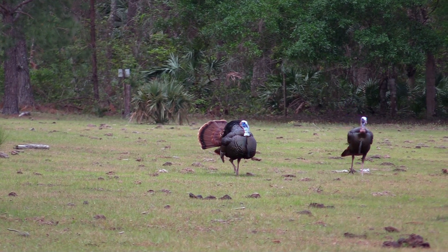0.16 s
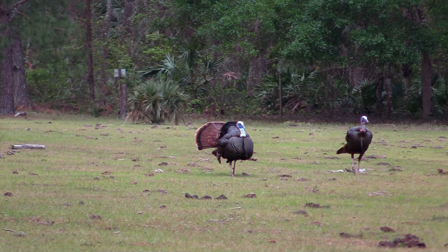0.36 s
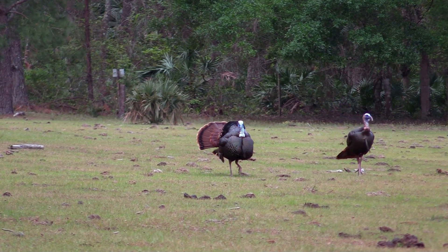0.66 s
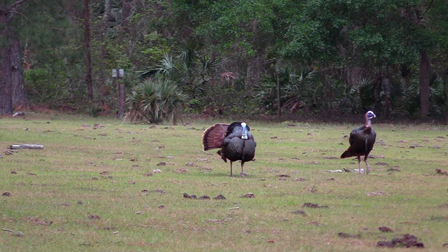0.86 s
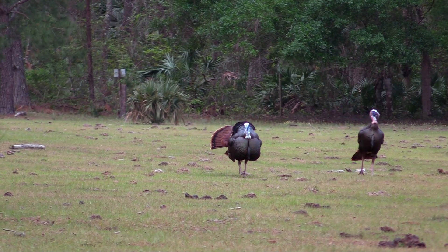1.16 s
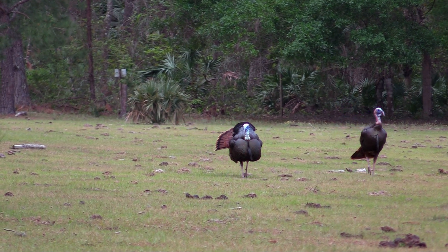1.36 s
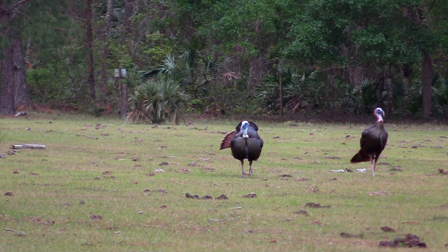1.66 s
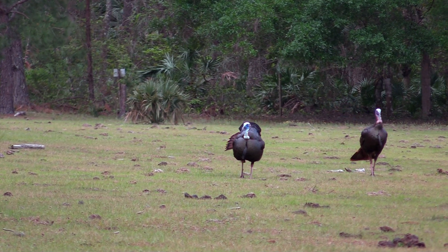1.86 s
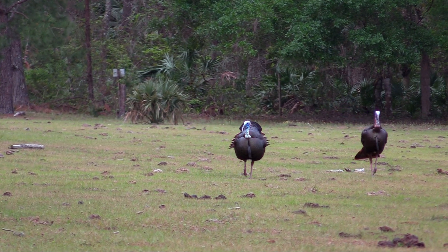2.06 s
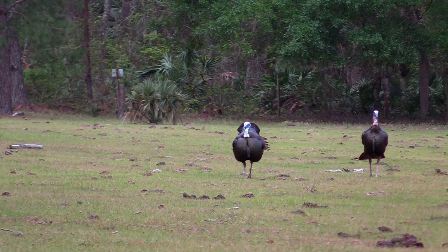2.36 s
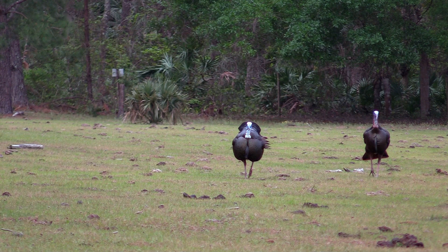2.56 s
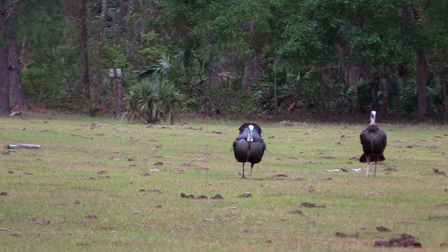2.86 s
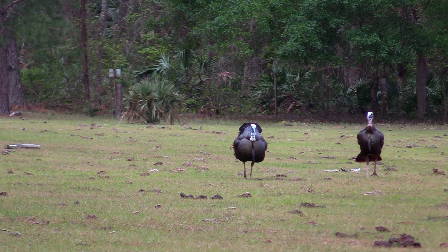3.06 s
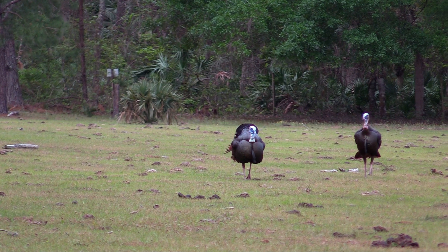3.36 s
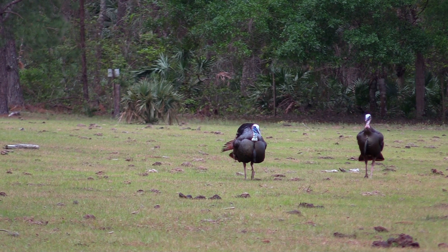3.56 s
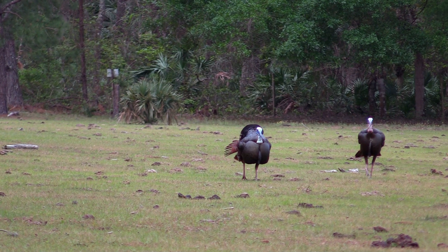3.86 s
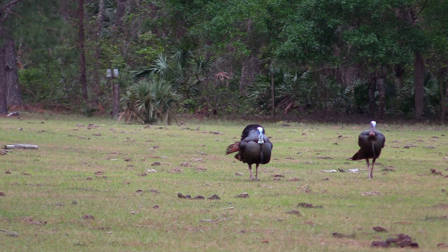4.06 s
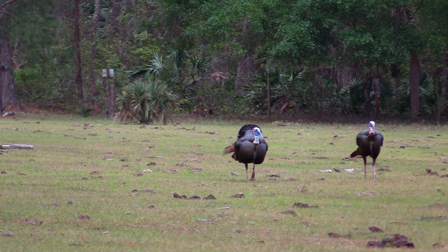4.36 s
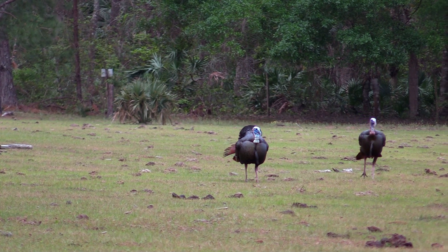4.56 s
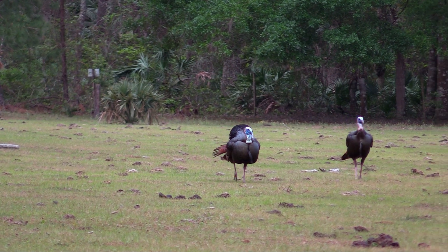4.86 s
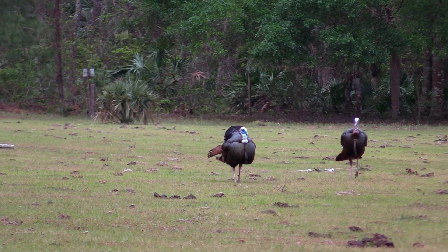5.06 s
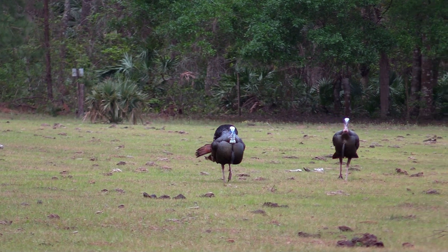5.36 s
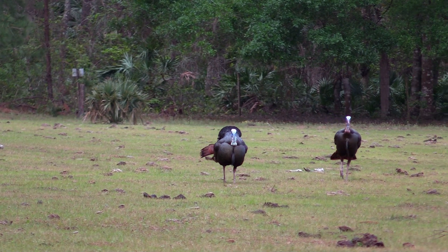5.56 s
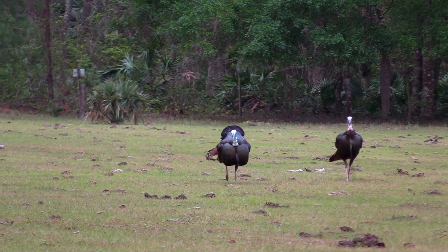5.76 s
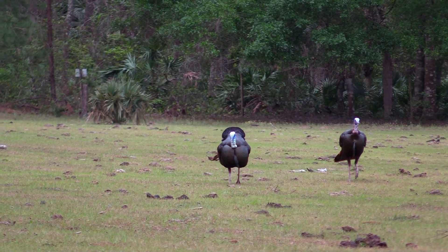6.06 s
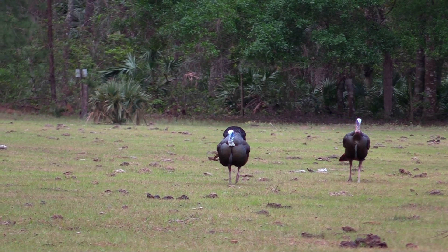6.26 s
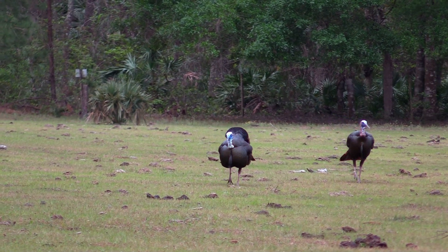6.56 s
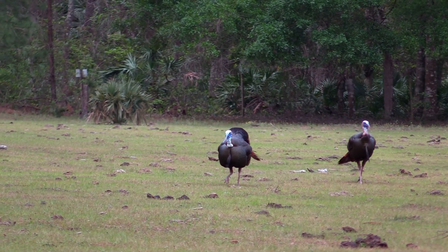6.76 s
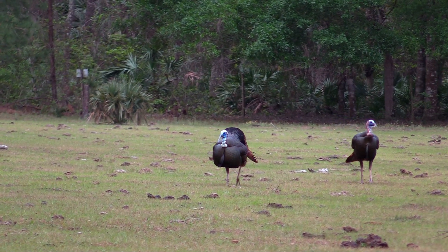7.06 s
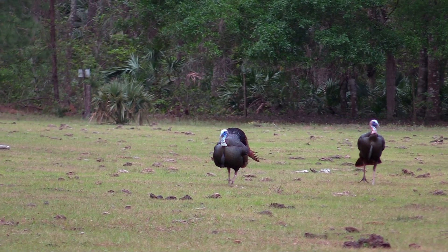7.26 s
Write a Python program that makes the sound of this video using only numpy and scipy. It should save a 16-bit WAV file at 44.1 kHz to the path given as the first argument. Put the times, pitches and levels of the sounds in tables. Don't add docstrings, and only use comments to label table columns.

```python
import sys
import numpy as np
from scipy import signal
from scipy.fft import rfft, irfft
from scipy.io import wavfile
from scipy.ndimage import uniform_filter1d, minimum_filter1d

SR = 44100
rng = np.random.default_rng(int(sys.argv[2]) if len(sys.argv) > 2 else 0)


def amplitude_ratio(level_db):
    exponent = np.asarray(level_db, float) / 20
    return 10 ** exponent


def to_wav(sig):
    pcm = np.clip(np.atleast_2d(sig), -1, 1) * 32767
    pcm = np.round(pcm).astype(np.int16)
    wavfile.write(sys.argv[1], SR, pcm.T)


N = 326781


def rms_one(x):
    return x / np.sqrt(np.mean(x ** 2) + 1e-20)


def at_hz(points, hz):
    table_hz, value = np.transpose(points)
    return np.interp(np.log(hz), np.log(table_hz + 1), value)


def drift(rate_hz, size):
    r = np.exp(-2 * np.pi * rate_hz / SR)
    wander = signal.lfilter([1], [1, -2 * r, r * r], rng.standard_normal(size + 9000))
    return rms_one(wander[9000:])


def peak(x, hz, width_hz):
    r = np.exp(-np.pi * width_hz / SR)
    poles = [1, -2 * r * np.cos(2 * np.pi * hz / SR), r * r]
    return signal.lfilter([(1 - r * r) / 2, 0, (r * r - 1) / 2], poles, x)


def double_peak(x, hz, width_hz):
    return peak(peak(x, hz, width_hz), hz, width_hz)


def cavity(x, peaks):
    return sum((-1) ** k * amplitude_ratio(db) * peak(x, hz, width) for k, (hz, width, db) in enumerate(peaks))


def cut(x, hz, kind, order):
    return signal.sosfilt(signal.butter(order, hz, kind, fs=SR, output="sos"), x)


SETTLE_S, CLEAN_LIFT = .014, .07
RELEASE_DB, RELEASE_CURVE = 22.5, 1.9
WAKE_S, CALM = .012, 1.15
BITE, END_CLEAR = 1.6, 0.41
HURRY = 1.3
DULLING_DB = 9.0
AIR_DB, PUFF_DB, PUFF_S, CLEAN_AIR_DB = -27.5, 13.5, .005, -2


def stroke(t, length, slack_hz, peak_db, swell_s, tight_in, tight_out, open_db, release_s, clean_s,
           rasp, depth, catch_s, lift_s, air_db):
    left = np.maximum(length - t, 0)
    woken = np.clip((t - clean_s) / WAKE_S + (clean_s == 0), 0, 1)
    tightness = tight_in * np.exp(-t / SETTLE_S) + tight_out * np.exp(-left / lift_s)
    clean_rise = CLEAN_LIFT * (1 - woken) * (1.2 - 1.0 * t / (clean_s + WAKE_S))
    hz = slack_hz * (1 + tightness + clean_rise)
    swell = open_db * np.clip(1 - t / swell_s, 0, 1)
    release = RELEASE_DB * np.clip(1 - left / release_s, 0, 1) ** RELEASE_CURVE
    db = peak_db - swell - release
    calm = np.exp(-(left / lift_s / CALM) ** 2)
    catch = tight_in * np.exp(-(t / catch_s) ** 2)
    depth = depth * woken * (1 - 0.53 * calm)
    rasp = rasp * (.15 + .85 * woken) * (1 - END_CLEAR * calm) + BITE * catch
    air = AIR_DB + air_db + PUFF_DB * np.exp(-t / PUFF_S) + CLEAN_AIR_DB * (1 - woken)
    return hz, 1 + HURRY * catch, db, depth, rasp, DULLING_DB * calm, air


PARTIAL_DB = [7, 1.5, -7, -8.5, -17, -11.5]
# resonance [Hz], width [Hz], level [dB].
THROAT_PEAKS = [(600, 1900, -8.5), (1166, 320, 1.5), (1990, 292, 0.5), (2760, 390, -32)]
# resonance [Hz], width [Hz], level [dB].
BREATH_PEAKS = [(3330, 460, 1), (5150, 280, 6), (7100, 3600, -11), (10500, 870, -9), (13800, 1700, -18)]


def yelp(length, rule, lock, shake, squeeze, middle_db, upper_db):
    t = np.arange(7000) / SR
    hz, hurry, db, depth, rasp, dull_db, air_db = stroke(t, length, *rule)
    depth, rasp = np.clip(depth, 0, 1), np.clip(rasp, 0, 1)
    slow = np.cumsum(hz / lock * hurry * (1 + .15 * rasp * drift(90, len(t)))) / SR
    swing = np.sin(2 * np.pi * slow) + 0.8 * np.sin(4 * np.pi * slow + 1.15)
    stumble = 1.2 * rasp ** 1.5 * drift(260, len(t))
    turn = 2 * np.pi * np.cumsum(hz) / SR + shake * depth * swing + stumble
    reed = sum(amplitude_ratio(level - k * dull_db) * np.cos((k + 1) * turn) for k, level in enumerate(PARTIAL_DB))
    reed = reed * (1 + squeeze * depth * np.cos(2 * np.pi * slow + 2.6))

    half_cycle = np.floor(2 * slow)
    beats = np.diff(half_cycle, prepend=-1) * np.where(half_cycle % 2, .4, 1)
    slaps = beats * amplitude_ratio(2.2 * rng.standard_normal(len(t)))

    lifts_db = [0, middle_db, upper_db, 0]
    throat = [(f, width, level + lift) for (f, width, level), lift in zip(THROAT_PEAKS, lifts_db)]
    damped = [(f, 1.18 * width, level) for f, width, level in throat[1:]]
    clear = rms_one(cavity(reed, throat)) * np.sqrt(1 - rasp ** 2)
    rough = 1.5 * rasp * rms_one(cavity(slaps + 1e-9, damped))
    fill = 0.45 * depth * amplitude_ratio(upper_db - 8.5) * rms_one(double_peak(slaps + 1e-9, 2080, 640))
    voice = cut(clear + rough + fill, 2860, "low", order=5)
    voice = cut(voice, 0.72 * hz.min(), "high", order=5)
    high_pocket = rms_one(double_peak(reed + 3.8 * rasp * slaps, 3370, 300))
    voice = voice + amplitude_ratio(-35.0) * high_pocket

    breathy = rng.standard_normal(len(t)) * (1 + 0.87 * np.cos(turn)) * (1 + .5 * swing * depth)
    air = amplitude_ratio(air_db) * rms_one(cut(cavity(breathy, BREATH_PEAKS), 13600, "low", order=10))
    edges = np.clip(t / 0.00079, 0, 1) * np.exp(-np.maximum(t - length, 0) / 0.00064)
    return (voice + air) * amplitude_ratio(db) * edges


# start [s], length [s], slack reed [Hz], peak [dB], swell [s].
CALLS = [
    (1.258, .110, 619, -12, 0.0051),
    (1.566, .118, 578.5, -5.0, .065),
    (1.872, 0.12, 614, -5, 0.042),
    (2.193, 0.12, 613.3, -5, 0.031),
    (2.510, .108, 673.6, -10.5, 0.029),
    (2.819, 0.099, 705.5, -12.5, 0.029),
    (3.127, 0.081, 906, -15.5, 0.01),
]
# reed tighter at the start [share], tighter at the end [share],
# opening under the peak [dB], release [s], clean lead-in [s].
STROKES = [(0.005, 0.36, -5, 0.028, 0.038), (0.51, 0.74, 10, 0.049, 0), (0.37, 0.76, 14, 0.059, 0.00046),
           (0.66, 0.82, 24.5, 0.045, 0.00032), (0.31, .72, 12.5, 0.049, 0.0023),
           (0.23, .85, 6.5, 0.018, 0.00025), (.09, 0.21, 16, 0.012, 0.0046)]
# steady rasp [0-1], flutter depth [0-1], time a tight reed takes to catch [s],
# time it takes to tighten at the end [s], extra air [dB].
GRAINS = [(.22, 0.55, .01, .022, -3), (.24, 0.56, .026, .013, 1.5), (.22, 0.52, .024, .017, 0.5),
          (.24, .6, .016, .011, 0.9), (0.299, .55, .018, .02, -.6), (.38, 0.65, .048, .021, 2),
          (.6, 0.58, .02, .008, 1.5)]
REED_CYCLES = [5, 4, 4, 4, 4, 4, 3]
# shake of pitch [rad], squeeze of strength [0-1],
# middle resonance [dB], upper resonance [dB].
FLUTTERS = [(.2, 1, 9.2, 4), (.45, 0.65, 0.5, 1.5), (.45, 0.97, 2.7, 2.5), (.45, 0.53, 1.1, 0),
            (.45, 0.5, 2.2, 3), (.55, 0.33, 1, 2.5), (.75, 0.25, 3.1, 5.0)]
# frequency [Hz], left over right [dB].
NEAR_OVER_FAR = [(300, -9), (620, 3), (800, 1), (1080, 8), (1250, 15), (2200, 11), (3300, 9.5), (5100, 6.5),
                 (6200, 0.5), (9000, 3), (13000, 3.5)]
# frequency [Hz], left ahead of right [radians].
NEAR_LEADS = [(0, 0), (1030, 1.8), (1640, .5), (3530, 1.6), (3880, 2.4), (5500, 3.8), (6200, 4.9),
              (7600, 5.8), (10300, 6.1), (15200, 6.4)]


def caller():
    left = np.zeros(N)
    for call, shape, grain, lock, flutter in zip(CALLS, STROKES, GRAINS, REED_CYCLES, FLUTTERS):
        s, length, *pitch_and_swell = call
        sound = yelp(length, [*pitch_and_swell, *shape, *grain], lock, *flutter)
        at = int(s * SR)
        left[at:at + len(sound)] += sound
    hz = np.arange(N // 2 + 1) * SR / N + 1
    lead = np.interp(hz, *np.transpose(NEAR_LEADS))
    right = irfft(rfft(left) * amplitude_ratio(-at_hz(NEAR_OVER_FAR, hz)) * np.exp(-1j * lead), N)
    trees = rng.standard_normal((2, 15000)) * np.exp(-np.arange(15000) / SR / 0.081)
    echo = signal.fftconvolve(left[None], trees, axes=1)[:, :N]
    return np.array([left, right]) + amplitude_ratio(-73.5) * echo


# time [s], thump [dB], treble above the thump [dB].
SNAPS = [
    (1.0303, -20, -10.5),
    (6.57, -40, 5),
    (6.67, -40, 4),
    (6.861, -38, 8),
    (6.905, -44, 11),
    (6.92, -44, 7),
]


def ticks():
    thumps, tips = np.zeros((2, N)) + 1e-18
    for s, db, treble_db in SNAPS:
        thumps[int(s * SR)] = amplitude_ratio(db)
        tips[int(s * SR)] = amplitude_ratio(db + treble_db)
    return 14 * cut(peak(thumps, 610, 1060), 2700, "low", order=2) + 5.1 * double_peak(tips, 8400, 5000)


# time [s], gain [dB].
GAIN_RIDE = [(0, 1), (1.24, 0.5), (1.33, -2), (1.54, -2.5), (1.65, -7.5), (2.45, -11.5), (2.83, -9.0),
             (3.07, -9.0), (3.2, -10.5), (3.32, -17.0), (3.49, -9.5), (3.7, -6.5), (4.3, -5), (4.9, -3),
             (5.5, -0.9), (6.1, 0.5), (6.75, 0.1), (7.41, -0.7)]


def gain_db():
    return np.interp(np.arange(N) / SR, *np.transpose(GAIN_RIDE))


# frequency [Hz], left-right likeness [-1 to 1].
PORT_LIKENESS = [(60, 0.84), (130, 0.94), (290, 0.8), (640, 0.31), (1410, -0.032), (3100, 0.37),
                 (6820, 0.65), (15000, 0.69)]
# frequency [Hz], left over right [dB].
PORT_TILT = [(200, 0), (700, -1.5), (2400, -1.9), (4400, -.3), (8000, 0)]


def banded_noise(spectrum, patchy_db):
    low_hz, high_hz = spectrum[0][0], spectrum[-1][0]
    edges = np.geomspace(low_hz, high_hz, int(3 * np.log2(high_hz / low_hz)) + 2)
    out, white = 0, rng.standard_normal((2, 2, N))
    for k, (low, high) in enumerate(zip(edges, edges[1:])):
        band = signal.butter(2, [low, high], "band", fs=SR, output="sos")
        mid, side = signal.sosfilt(band, white[k % 2])
        hz = np.sqrt(low * high)
        alike = np.clip(at_hz(PORT_LIKENESS, hz), -1, 1)
        flicker = np.repeat(drift(600, size=N // 100 + 1), 100)[:N]
        tilt_db = at_hz(PORT_TILT, hz) * np.array([[.5], [-.5]])
        gain = amplitude_ratio(at_hz(spectrum, hz) + patchy_db * flicker + tilt_db)
        out = out + gain * (np.sqrt(1 + alike) * mid + np.sqrt(1 - alike) * side * [[1], [-1]])
    return rms_one(out)


# frequency [Hz], density [dB per Hz].
RUMBLE_SPECTRUM = [(15, -52), (25, -35), (52, -3), (117, 2), (167, -4), (198, -3.5), (237, -12.5),
                   (320, -18), (420, -15.5), (700, -120)]
# frequency [Hz], density [dB per Hz].
LEAF_SPECTRUM = [(150, -46), (260, -7.5), (709, -6.5), (769, -4.5), (897, -7.5), (1500, -9.5),
                 (3000, -19.5), (3900, -81), (6600, -120)]
# frequency [Hz], density [dB per Hz].
HISS_SPECTRUM = [(1650, -1.5), (2800, -9), (3030, 1), (3320, 0), (3620, -6), (4430, -6.5), (5810, -4.5),
                 (6610, -9.5), (11600, -16), (15500, -25)]
# frequency [Hz], width [Hz], level against the hiss [dB].
INSECT_BANDS = [(5060, 350, -11.5), (5820, 250, -13)]
# time [s], level added to the rumble [dB], half length [s].
WIND_PUFFS = [(.0, 6, 0.063), (0.402, 7.5, .06), (0.546, 8, 0.05), (0.823, 5, 0.099), (1.24, 7, 0.035),
              (2.53, 8, 0.047), (2.85, 5.0, 0.076), (3.082, 6.0, 0.076), (3.684, 2, 0.061),
              (3.96, 2, 0.053), (4.458, 2.5, .2), (4.824, 8, 0.11), (5.503, 2, 0.16), (6.98, 1, 0.12),
              (7.41, -2, .15)]
RUMBLE_DB, LEAVES_DB, HISS_DB = -41, -39, -49.5
RUMBLE_FOLLOWS, LEAVES_FOLLOWS = 0.69, 0.95


def field():
    t = np.arange(N) / SR
    gusts_db = sum(db * np.exp(-((t - s) / half) ** 2) for s, db, half in WIND_PUFFS)
    rumble = amplitude_ratio(RUMBLE_DB + RUMBLE_FOLLOWS * gain_db() + gusts_db)
    leaves = amplitude_ratio(LEAVES_DB + LEAVES_FOLLOWS * gain_db())
    hiss = amplitude_ratio(HISS_DB + gain_db())
    insects = 0
    for hz, width, db in INSECT_BANDS:
        song = rms_one(double_peak(rng.standard_normal((2, N)), hz, width))
        insects = insects + amplitude_ratio(db + drift(3.7, size=N)) * song
    wind = rumble * banded_noise(RUMBLE_SPECTRUM, patchy_db=2.0)
    rustle = leaves * banded_noise(LEAF_SPECTRUM, patchy_db=0.54)
    return wind + rustle + hiss * (banded_noise(HISS_SPECTRUM, patchy_db=0.45) + insects)


# time [s], level [dB].
ENGINE_LOAD = [(0.0, -29), (.6, -51), (0.842, -35.5), (2.4, -44.5), (3.1, -50), (3.5, -48), (4.06, -34.5),
               (4.54, -36.5), (6.15, -38), (6.54, -33), (7.0, -29.5), (7.41, -32.5)]
# frequency [Hz], width [Hz], level [dB].
HUM_BANDS = [(107, 63, -5.5), (194.6, 16, -11)]


def engine():
    load_db = np.interp(np.arange(N) / SR, *np.transpose(ENGINE_LOAD))
    noise = rng.standard_normal(N) + 0.076 * rng.standard_normal((2, N))
    hum = sum(amplitude_ratio(level) * rms_one(double_peak(noise, hz, width)) for hz, width, level in HUM_BANDS)
    return amplitude_ratio(load_db + gain_db()) * hum


# start in [s], length [s], level [dB].
WHISTLES = [(.38, .15, -56.0), (.8, .25, -52.5), (1.28, 0.2, -54.5), (5.8, .18, -56), (6.235, 0.11, -51),
            (6.695, 0.15, -50)]
# start [s], length [s], level [dB].
WHISTLE_ENDS = [(6.37, 0.2, -52.5), (6.829, 0.14, -53)]
# start [s], length [s], level [dB].
ANSWERS = [(1.05, 0.2, -54), (6.01, 0.086, -53.0), (6.46, .22, -54)]
# start [s], length [s], level [dB].
CHIPS = [(5.45, .035, -55), (5.69, .045, -59)]
# start [s], length [s], level [dB].
TRILLS = [(5.91, 0.18, -57), (6.13, 0.19, -56)]
# start [s], length [s], level [dB].
DOVE_NOTES = [(5.793, .14, -52), (6.013, 0.15, -50.5), (6.171, 0.082, -49), (6.3, .092, -54),
              (6.63, 0.056, -52)]
# start [s], length [s], level [dB].
FAR_DOVE_NOTES = [(.047, 1.4, -56), (3.901, 1.3, -54.5), (5.304, 0.58, -60)]
# first pitch [Hz], sag [Hz per s], blur [Hz].
SONG_VOICES = [
    (3420, 550, 85),
    (3330, 450, 110),
    (2540, 200, 80),
    (6940, -600, 60),
    (7290, 1100, 200),
    (766, 55, 16),
    (765, 3, 45),
]


def birds():
    out = np.zeros((2, N))
    songs = [WHISTLES, WHISTLE_ENDS, ANSWERS, CHIPS, TRILLS, DOVE_NOTES, FAR_DOVE_NOTES]
    for (first_hz, sag_hz, blur_hz), notes in zip(SONG_VOICES, songs):
        for s, length, db in notes:
            size, at = int(length * SR), int(s * SR)
            turn = 2 * np.pi * np.cumsum(first_hz - sag_hz * np.arange(size) / SR) / SR
            for channel in out:
                blur = .4 + 40 / blur_hz + drift(blur_hz, size) + 1j * drift(blur_hz, size)
                note = np.real(blur * np.exp(1j * turn)) * np.hanning(size) ** 0.12
                channel[at:at + size] += amplitude_ratio(db) * note
    return out


def scene():
    return caller() + ticks() + field() + engine() + birds()


def low_pass(x):
    return signal.sosfilt(signal.butter(12, 15650, fs=SR, output="sos"), x)


def record(dry):
    room = minimum_filter1d(1 / np.maximum(np.abs(dry).max(axis=0), 1), size=257)
    mix = dry * uniform_filter1d(room, size=129)
    return low_pass(mix)


dry = scene()
out = record(dry)
to_wav(out)
```